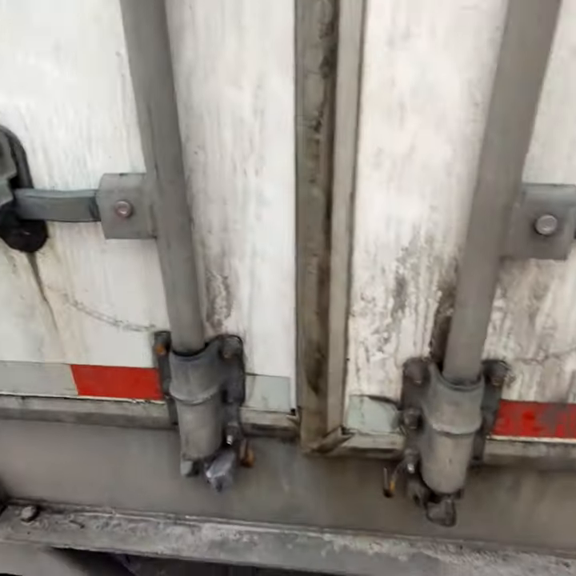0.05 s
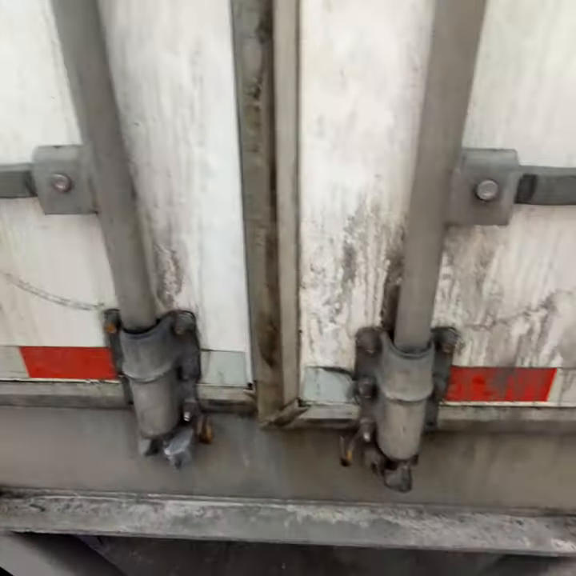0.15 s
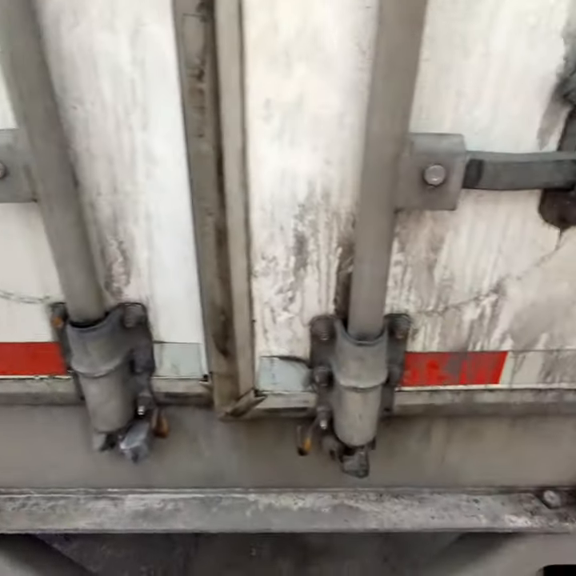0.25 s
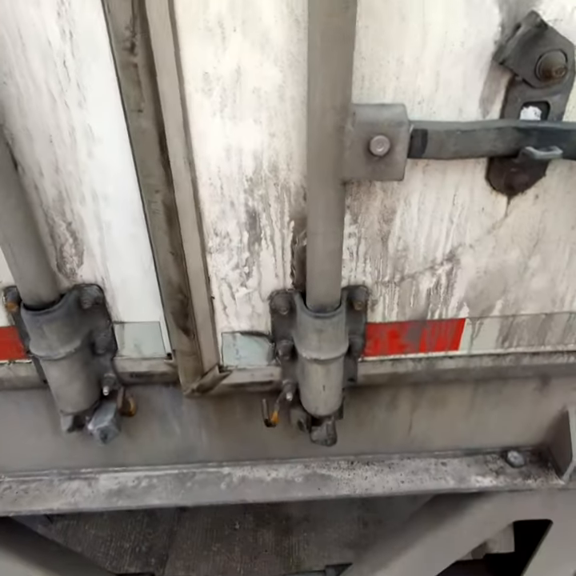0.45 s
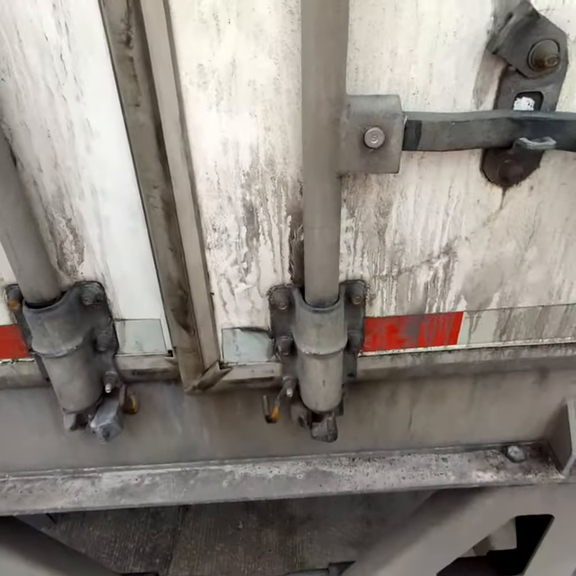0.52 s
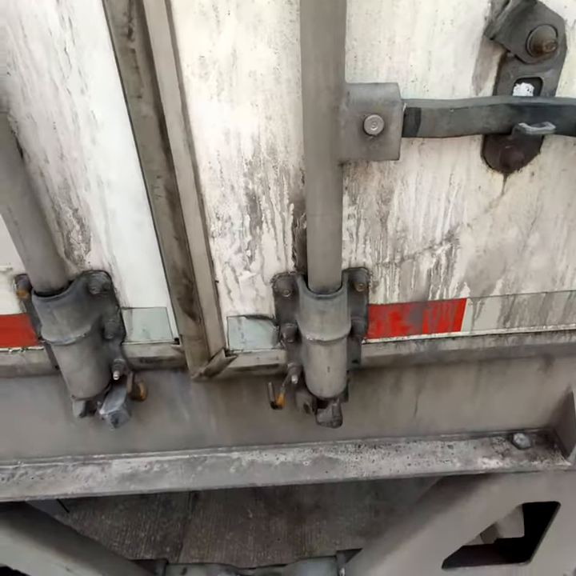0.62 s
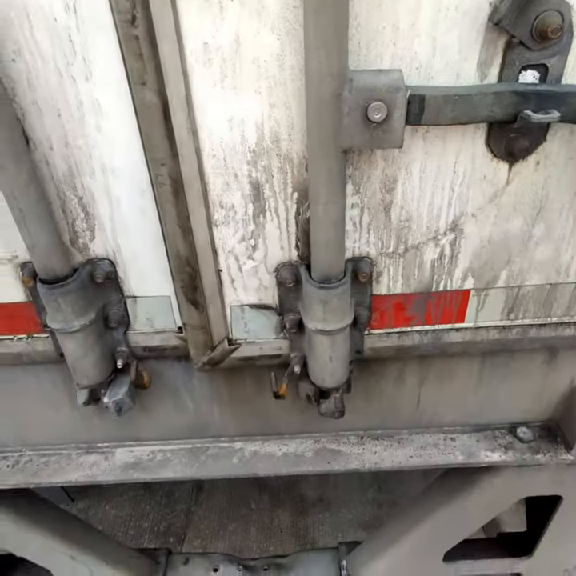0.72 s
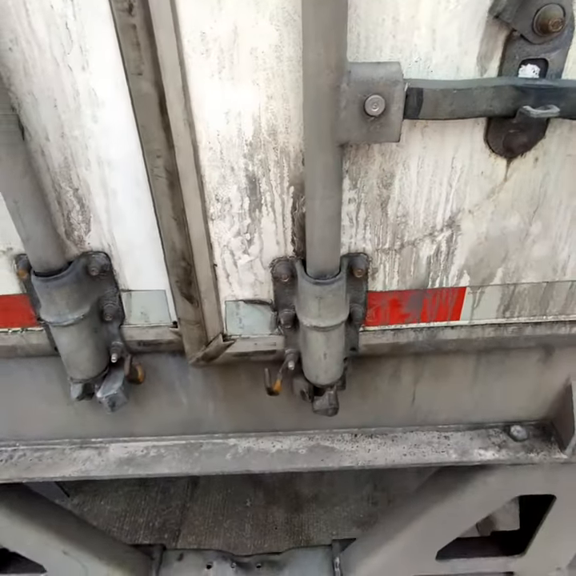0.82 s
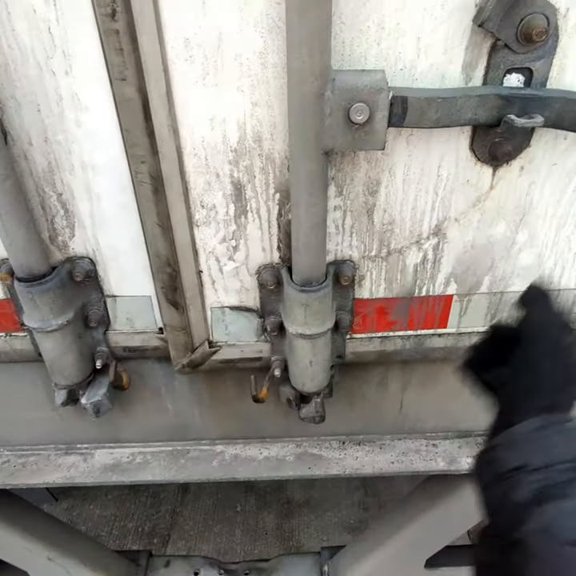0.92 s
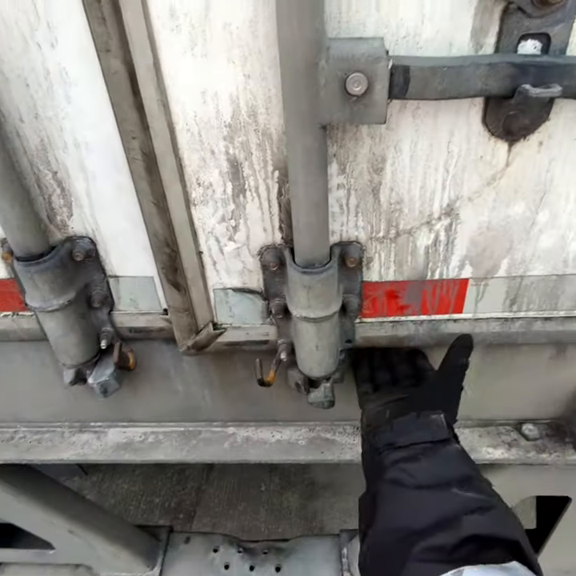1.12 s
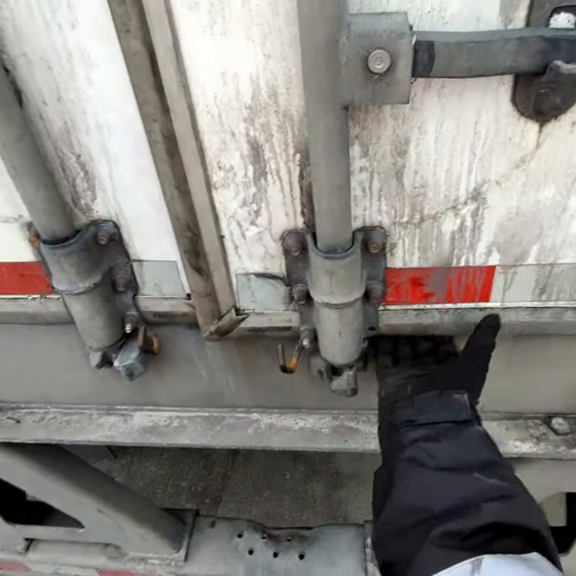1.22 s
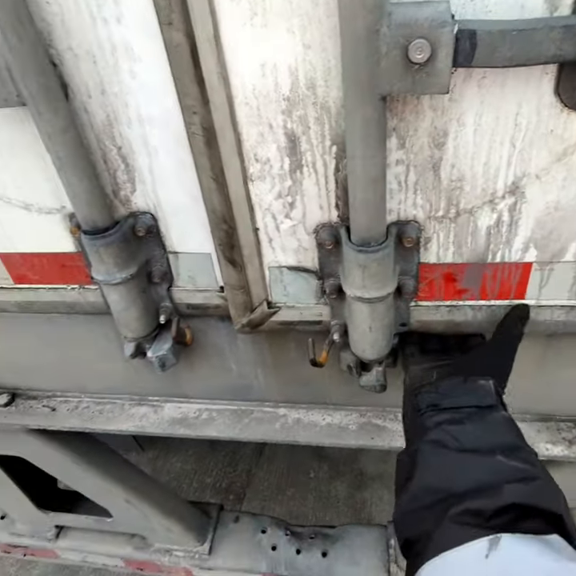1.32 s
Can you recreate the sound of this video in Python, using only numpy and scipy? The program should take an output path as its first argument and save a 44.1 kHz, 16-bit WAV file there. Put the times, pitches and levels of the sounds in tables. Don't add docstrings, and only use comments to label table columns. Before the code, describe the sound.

A loose metal door latch rattles with three or four hard, hollow clanks in the first half second, brief high pings between them, then a softer tap and faint bumps over low road hum, recorded close outdoors.

```python
import sys
import numpy as np
from scipy import signal
from scipy.fft import rfft, irfft
from scipy.io import wavfile

SR = 44100
rng = np.random.default_rng(int(sys.argv[2]) if len(sys.argv) > 2 else 0)


def unload_wav(signal):
    wavfile.write(
        sys.argv[1],
        SR,
        np.round(np.clip(np.atleast_2d(signal).T, -1, 1) * 32767).astype(np.int16),
    )


def nominal_scale(level):
    x = np.asarray(level, float) / 20
    return 10 ** x


N = 59535


def rms_one(x):
    return x / np.sqrt(np.mean(x ** 2) + 1e-20)


def in_time(rows):
    s, db = np.transpose(rows)
    return nominal_scale(np.interp(np.arange(N) / SR, s, db))


def at_hz(points, hz):
    p = np.array(points, float)
    return np.interp(np.log(hz + 1), np.log(p[:, 0] + 1), p[:, 1])


def drift(rate_hz):
    r = np.exp(-2 * np.pi * rate_hz / SR)
    wander = signal.lfilter([1], [1, -2 * r, r * r], rng.standard_normal(N + SR))
    return rms_one(wander[SR:])


def ring(x, hz, t60):
    r, w = nominal_scale(-60 / (t60 * SR)), 2 * np.pi * hz / SR
    return signal.lfilter([0, np.sin(w)], [1, -2 * r * np.cos(w), r * r], x + 1e-18)


def body(x, modes):
    return sum(nominal_scale(db) * ring(x, hz, t60) for hz, db, t60 in modes)


def dying(s, db, t60):
    kicks = np.zeros(N)
    np.add.at(kicks, (np.asarray(s) * SR).astype(int), nominal_scale(np.asarray(db)))
    return signal.lfilter([1], [1, -nominal_scale(-60 / (t60 * SR))], kicks)


def grains(per_s, spread_db):
    sizes = nominal_scale(spread_db * np.minimum(rng.exponential(1, N), 4)) * rng.choice([-1, 1], N)
    return sizes * (rng.random(N) < per_s / SR)


# (frequency [Hz], likeness [0 to 1])
LEFT_RIGHT_LIKENESS = [(60, .95), (640, 1), (1400, 1), (2500, 0.62), (4000, 0.024), (15000, 0.17)]


def coloured(spectrum, patchy_db):
    hz = np.fft.rfftfreq(N, 1 / SR)
    p = np.array(spectrum)
    alike = np.clip(at_hz(LEFT_RIGHT_LIKENESS, hz), 0, 1)
    mid, side = rfft(rng.standard_normal((2, N)))
    ears = np.sqrt(1 + alike) * mid + np.sqrt(1 - alike) * side * [[1], [-1]]
    ears = nominal_scale(at_hz(p, hz)) * ears
    together = drift(4.0)
    place = 2 * np.log2(hz + 1)
    total = 0
    for k in range(int(2 * np.log2(p[0, 0])), int(2 * np.log2(p[-1, 0])) + 1):
        flicker = nominal_scale(patchy_db * (0.87 * together + drift(10.3)))
        share = np.sqrt(np.clip(1 - abs(place - k), 0, 1))
        total = total + flicker * irfft(ears * share, N)
    return rms_one(total)


# (time [s], level [dB])
TRAFFIC_LEVEL = [(0, -52), (.07, -54.5), (.2, -45.5), (.6, -48.5), (.9, -49), (1.1, -48), (1.35, -49)]
# (frequency [Hz], level [dB])
ROAD_SPECTRUM = [(30, 3.5), (60, 5.5), (300, -1.5), (600, -3), (1400, -7.5), (2400, -12.5), (3200, -21),
                 (5500, -22.5)]


def traffic():
    return nominal_scale(3) * in_time(TRAFFIC_LEVEL) * coloured(ROAD_SPECTRUM, patchy_db=2.5)


# (time [s], level [dB])
WHINE_LEVEL = [(.55, -56), (.7, -54.5), (.88, -53.5), (1.0, -71), (1.24, -47), (1.29, -47), (1.35, -43)]


def whine():
    return in_time(WHINE_LEVEL) * rms_one(ring(rng.standard_normal(N), hz=1386, t60=0.0066))


# (time [s], level [dB])
SLEEVE_LEVEL = [(0, -60.5), (.2, -59), (.36, -61), (.5, -56.5), (.72, -61), (.95, -54.5), (1.12, -55),
                (1.2, -53), (1.265, -44.5), (1.29, -57), (1.35, -55)]
# (frequency [Hz], level [dB])
CLOTH_SPECTRUM = [(3000, -52), (4100, -11), (4700, -12), (5300, -18.5), (6200, -7.5), (9600, -9),
                  (13000, -2), (14300, 2), (14600, -65)]


def sleeve():
    return in_time(SLEEVE_LEVEL) * coloured(CLOTH_SPECTRUM, patchy_db=1.6)


# (time [s], level [dB])
RUMBLE_LEVEL = [(0, -44.5), (.1, -48.5), (.21, -41.5), (.3, -28.5), (.37, -41), (.5, -31.5), (.62, -41),
                (.85, -40), (.97, -57.5), (1.08, -49.5), (1.2, -67), (1.35, -50.5)]
# (frequency [Hz], level [dB], t60 [s])
PANEL_MODES = [(113, -14, 0.039), (168.4, 2.5, 0.075), (224.8, 5, 0.062), (306.5, -4, 0.071),
               (430, -48, 0.035)]


def rumble():
    modes = [(hz, db - 3 * k, .07) for k, (hz, db, _) in enumerate(PANEL_MODES)]
    bumps = body(grains(per_s=250, spread_db=2.5), modes)
    low_pass = signal.butter(2, 450, fs=SR, output="sos")
    return in_time(RUMBLE_LEVEL) * rms_one(signal.sosfilt(low_pass, bumps))


# (time [s], level [dB])
DRAG_LEVEL = [(.19, -57), (.235, -42.5), (.26, -40.5), (.32, -35.5), (.345, -64), (.41, -44.5),
              (.46, -42.5), (.52, -38), (.58, -68)]
# (frequency [Hz], level [dB], t60 [s])
BRACKET_MODES = [(838, 12.5, 0.015), (1046, 6.5, 0.032), (1250, -18, 0.077), (1587, 1, 0.042),
                 (1800, 3, 0.011), (2135, -4, 0.033), (2276, -7, 0.029), (3230, -45, .015)]
# (frequency [Hz], level [dB per Hz])
CRACK_SPECTRUM = [(1760, 1), (3000, -17), (3710, 2.5), (4530, -4), (6170, 3), (8530, 2.5), (9920, 0),
                  (13300, 1.5), (15500, 2)]
HISS_PATCHY_DB = 2.5


def drag():
    grit = grains(per_s=1400, spread_db=3.1)
    dull = ring(grit, 623, 0.015) + 1.4 * ring(grit, 370, 0.011)
    gritty = 0.79 + rms_one(signal.lfilter([1], [1, -.985], abs(grit)))
    hiss = rms_one(gritty * coloured(CRACK_SPECTRUM, HISS_PATCHY_DB))
    grind = rms_one(body(grit, BRACKET_MODES)) + nominal_scale(3) * rms_one(dull) + nominal_scale(-8.5) * hiss
    return in_time(DRAG_LEVEL) * grind


PIN_HZ, HASP_HZ = 9362, 8323
# (struck [s], gripped [s], pitch [Hz], level [dB], t60 [s])
PIN_RINGS = [(.2550, .275, HASP_HZ, -42, .2), (.2765, .310, PIN_HZ, -40, .6),
             (.3100, .405, PIN_HZ, -48, .4), (.3120, .335, HASP_HZ, -45, .07), (.3120, .33, 5090, -46, .07),
             (.4500, .468, 4200, -43, .1), (.5800, .68, 4050, -60, .5), (.4585, .506, PIN_HZ, -46, .3),
             (.5060, .6, PIN_HZ, -51, .3)]
GRIP_S = 0.0056


def pins():
    t = np.arange(N) / SR
    out = np.zeros(N)
    for struck, gripped, hz, db, t60 in PIN_RINGS:
        tone = dying([struck], [db], t60) * np.sin(2 * np.pi * hz * (t - struck))
        out += tone * np.exp(-np.maximum(t - gripped, 0) / GRIP_S)
    return out


# (time [s], clatter [dB], crack [dB], clink pitch [Hz], clink [dB])
STEEL_HITS = [(.0050, -39, -56, 2000, -40), (.1655, -46, -66, 2300, -46), (.1975, -39, -66, 1200, -40),
              (.2335, -23, -29, 1800, -27), (.2400, -32, -50, 2300, -35), (.2555, -34, -44, 2200, -27),
              (.2590, -31, -50, 2050, -29), (.2640, -32, -50, 2300, -32), (.2745, -31, -40, 2500, -26),
              (.2925, -30, -38, 2100, -30), (.3990, -42, -52, 3000, -42), (.4050, -42, -46, 8000, -44),
              (.4130, -27, -40, 1600, -30), (.4180, -32, -50, 2300, -34), (.4470, -29, -36, 1290, -27),
              (.4520, -34, -44, 1300, -33), (.4600, -35, -52, 2000, -37), (.4700, -34, -52, 1300, -34),
              (.7750, -50, -75, 1200, -42), (.7990, -50, -75, 1450, -42), (.9020, -48, -66, 2300, -46),
              (.2884, -28, -24, 6100, -25), (.2886, -40, -40, 4800, -28), (.3079, -19, -20, 4900, -26),
              (.3115, -26, -31, 9740, -25), (.4112, -25, -42, 11400, -38), (.4433, -21, -30, 8640, -28),
              (.4560, -32, -50, 4200, -38), (.4909, -31, -23, 6520, -22), (.5060, -28, -28, 2500, -24),
              (.5168, -24, -26, 4700, -32), (.7655, -44, -75, 950, -40), (.8930, -50, -50, 3400, -43),
              (.8935, -60, -60, 2900, -48)]
CLATTER_T60_S, CRACK_T60_S, CLINK_T60_S = 0.028, .017, 0.012
CONTACT_S = .0004


def clinks():
    s, clatter_db, crack_db, clink_hz, clink_db = np.transpose(STEEL_HITS)
    short_modes = [(hz, db, .01) for hz, db, _ in BRACKET_MODES]
    clatter = rms_one(body(rng.standard_normal(N), short_modes))

    rings = np.zeros(N)
    for start, hz, db in zip(s, clink_hz, clink_db):
        scrape = dying([start], [db], 0.011) * rng.standard_normal(N) * 0.23
        rings += ring(scrape, hz, CLINK_T60_S * (2400.0 / hz) ** 0.48)

    crack = coloured(CRACK_SPECTRUM, HISS_PATCHY_DB)
    crack = (crack + .5 * crack[::-1]) * .5
    touch = int(CONTACT_S * SR)
    burst = np.convolve(dying(s, crack_db, CRACK_T60_S), np.ones(touch) / touch)[:N]
    return dying(s, clatter_db, CLATTER_T60_S) * clatter + burst * crack + rings


def knock(db, hz, cycles):
    t = np.arange(SR // 10) / SR
    u = t * hz / cycles
    return nominal_scale(db) * u * np.exp(1 - u) * np.sin(2 * np.pi * hz * t)


# (time [s], knock [dB], knock pitch [Hz], boom [dB], push direction [+1 or -1])
PANEL_HITS = [(0.2014, -27.5, 344, -29.5, 1), (.2336, -12.5, 397, -21, -1), (0.2355, -11.5, 960, -17.5, 1),
              (.2400, -22, 505, -43, 1), (.2640, -28, 646, -35, 1), (.2690, -29, 420, -32, 1),
              (.2780, -27, 500, -25, -1), (0.259, -17, 600, -29, 1), (.2612, -18, 700, -35, -1),
              (.2920, -18, 630, -25, -1), (0.3037, -22, 500, -17.5, -1), (.3084, -4.5, 664, -13.5, 1),
              (.3099, -5.5, 676, -25, 1), (.3140, -23, 595, -26, 1), (.3900, -19.5, 320, -28, -1),
              (0.4111, -15.5, 800, -37, -1), (0.411, -11, 620, -13, -1), (.4150, -22, 705, -38, 1),
              (0.419, -22.5, 354, -19, 1), (0.445, -23, 965, -31, 1), (.4468, -24, 766, -46, -1),
              (0.4946, -15.5, 640, -18, 1), (0.499, -23.5, 447, -28, 1), (.5090, -21, 500, -32, 1),
              (0.5065, -17.5, 460, -24, -1), (.5171, -6.5, 493, -15, 1), (0.5194, -9, 610, -17, -1),
              (0.5263, -18, 400, -25, 1), (.5220, -15, 334, -30, 1), (.7652, -20, 618, -29, 1),
              (0.7644, -20, 270, -28.5, 1), (.7673, -25.5, 650, -38, -1), (.7720, -31, 485, -36, 1)]
# (time [s], level [dB], pitch [Hz])
LONE_KNOCKS = [(.478, -23, 129), (0.487, -18.5, 114), (.535, -18, 184), (0.566, -29.5, 148),
               (0.612, -29.5, 131), (0.648, -28, 144), (0.668, -29.5, 105), (.697, -28.5, 108),
               (0.708, -37.5, 124), (.787, -30.5, 200), (0.2335, -21, 980), (.2565, -29, 2200),
               (.2585, -32, 2000), (0.2757, -31, 2700), (.2778, -33, 2300), (.3900, -30, 790),
               (0.412, -17.5, 770), (0.414, -25, 1100), (.4440, -29, 2800), (0.45, -34, 2400),
               (0.7671, -27, 300), (1.056, -36.5, 94.5), (.545, -27, 302), (.556, -30, 332),
               (0.126, -36.5, 109), (.175, -31.5, 99), (.275, -29, 81.5), (.965, -42.5, 85),
               (0.777, -33.5, 194), (0.803, -37, 150), (0.902, -36.5, 96), (1.031, -27.5, 243),
               (1.045, -27, 222), (1.1, -37, 118), (1.287, -38, 167)]
BOOM_CONTACT_S = 0.0012


def thuds():
    out, push = np.zeros(N + SR), np.zeros(N)
    for s, db, hz, boom_db, way in PANEL_HITS:
        i = int(s * SR)
        out[i:i + SR // 10] += np.sign(way) * knock(db, hz, cycles=0.48)
        push[i] = np.sign(way) * nominal_scale(boom_db)
    for s, db, hz in LONE_KNOCKS:
        i = int(s * SR)
        out[i:i + SR // 10] -= knock(db, hz, cycles=0.45)
    soft = np.hanning(int(2 * BOOM_CONTACT_S * SR))
    boom = body(np.convolve(push, soft / soft.sum())[:N], PANEL_MODES)
    return out[:N] + .5 * boom


def scene():
    tone = whine()
    door = thuds() + clinks() + pins() + drag() + rumble()
    around = sleeve() + traffic()
    return door + tone + around


def top_cut(x):
    return signal.sosfilt(signal.butter(12, 15670, fs=SR, output="sos"), x)


# (frequency [Hz], difference [dB])
EAR_LEVELS = [(1200, 0), (2500, -2.5), (5300, -8), (6800, 3), (9000, 7), (11000, 11), (14000, 15)]
# (frequency [Hz], difference [rad])
EAR_PHASES = [(0, .25), (250, .05), (1000, .1), (1600, .35), (2600, .5), (3800, 2.6), (7400, -1.4),
              (11000, -.6), (15200, -5)]


def record(dry):
    hz = np.fft.rfftfreq(N, 1 / SR)
    side = np.array([[.5], [-.5]])
    phase = np.interp(hz, *np.transpose(EAR_PHASES))
    ports = nominal_scale(side * at_hz(EAR_LEVELS, hz)) * np.exp(1j * side * phase)
    x = irfft(rfft(dry) * ports, N)
    x = signal.sosfilt(signal.cheby2(10, 60, 15500, fs=SR, output="sos"), x)
    x = signal.sosfilt(signal.butter(4, 64.7, "high", fs=SR, output="sos"), x)
    return top_cut(x)


dry = scene()
out = record(dry)
unload_wav(out)
```